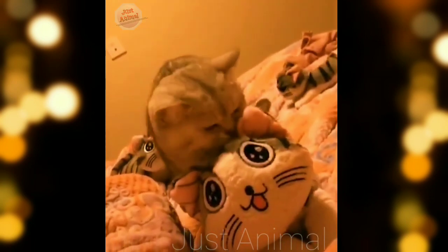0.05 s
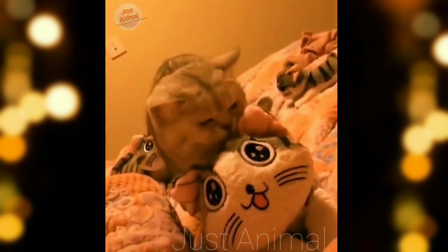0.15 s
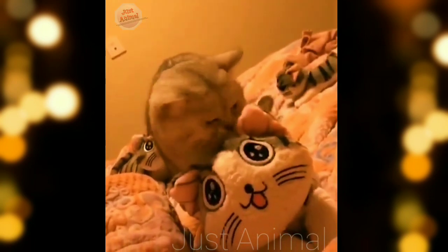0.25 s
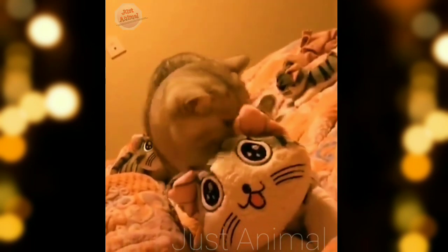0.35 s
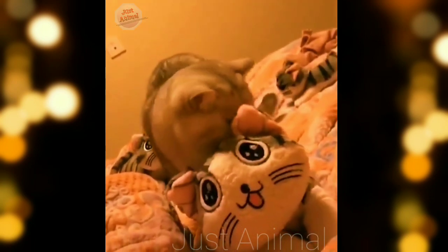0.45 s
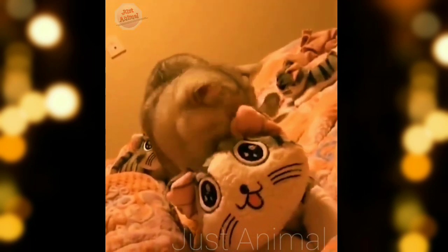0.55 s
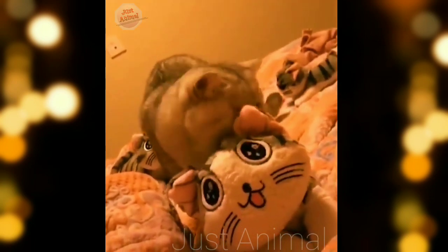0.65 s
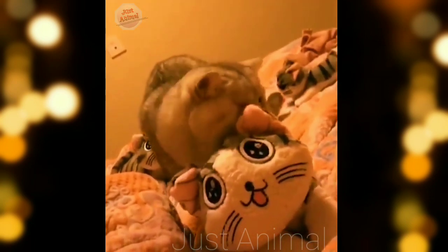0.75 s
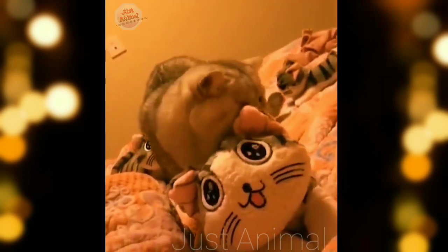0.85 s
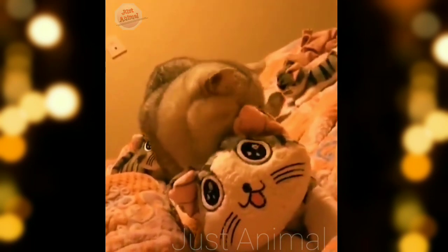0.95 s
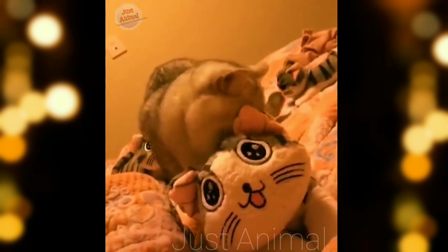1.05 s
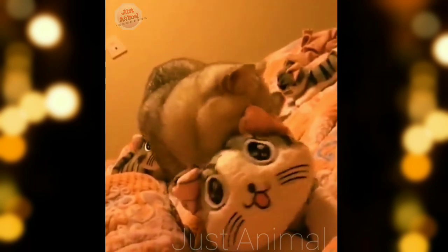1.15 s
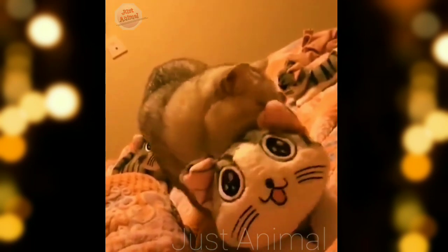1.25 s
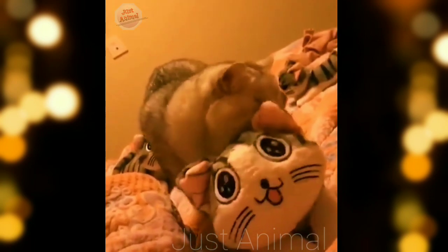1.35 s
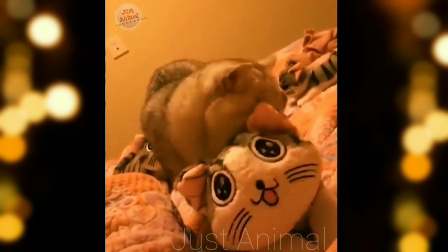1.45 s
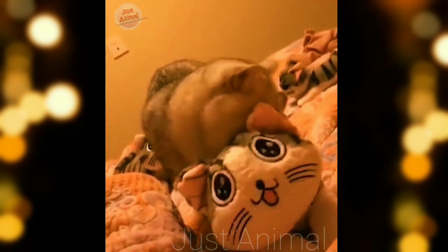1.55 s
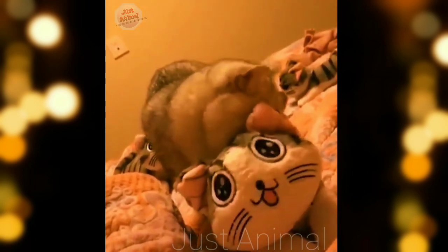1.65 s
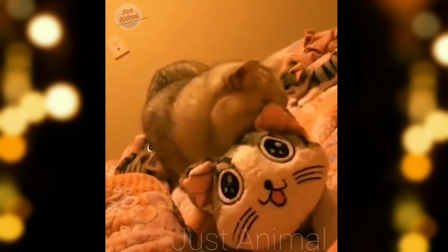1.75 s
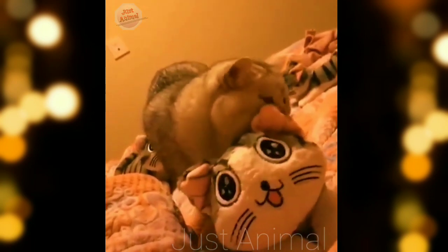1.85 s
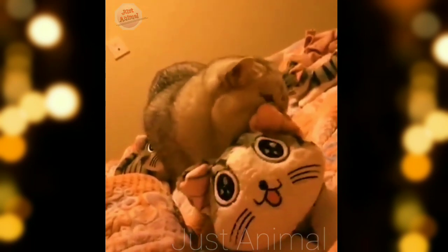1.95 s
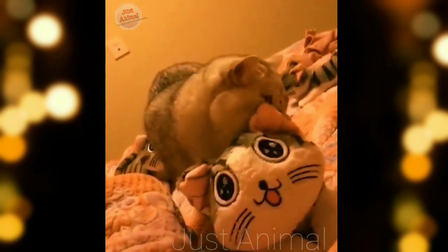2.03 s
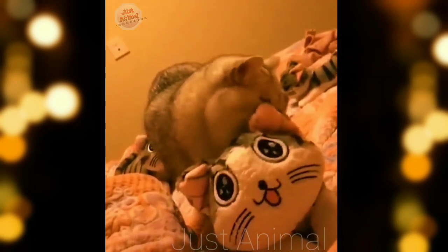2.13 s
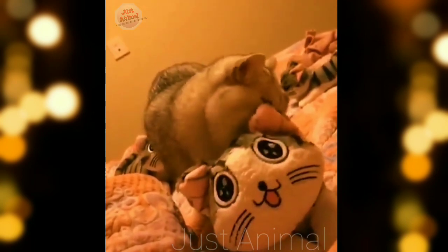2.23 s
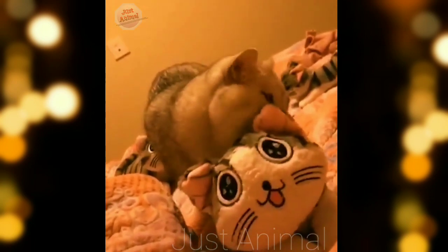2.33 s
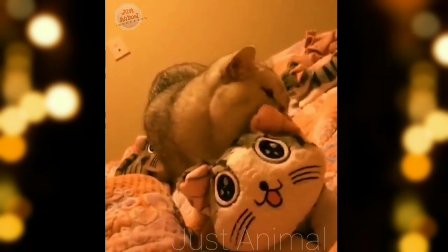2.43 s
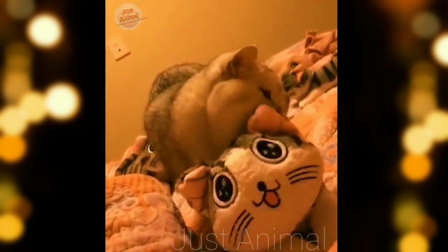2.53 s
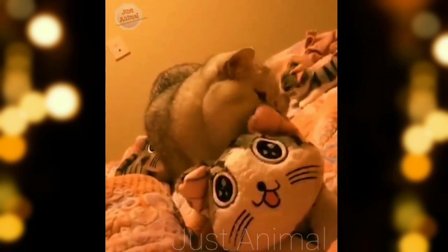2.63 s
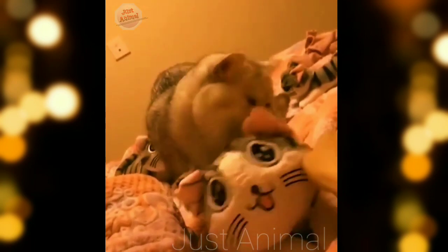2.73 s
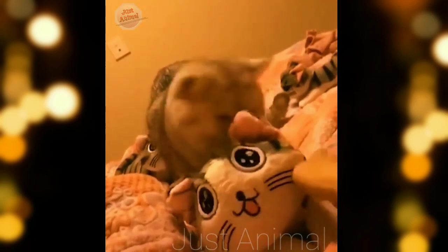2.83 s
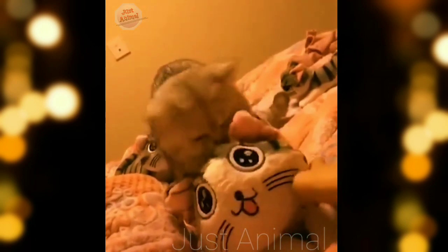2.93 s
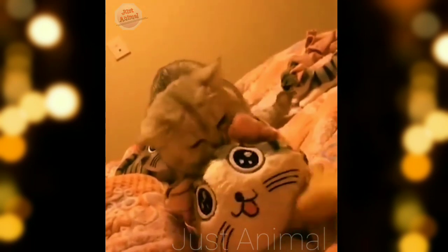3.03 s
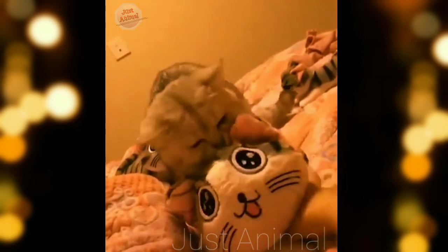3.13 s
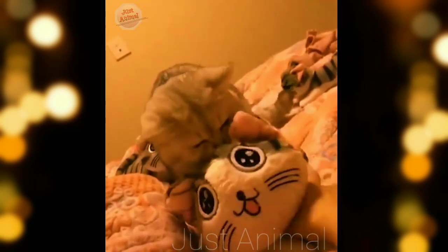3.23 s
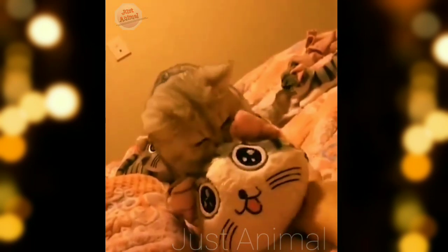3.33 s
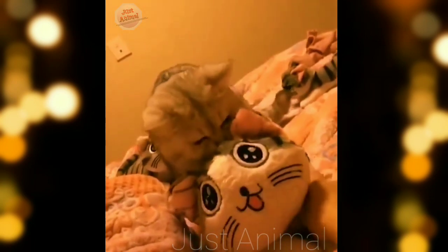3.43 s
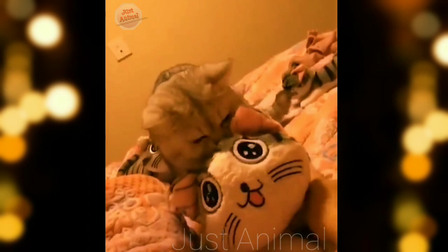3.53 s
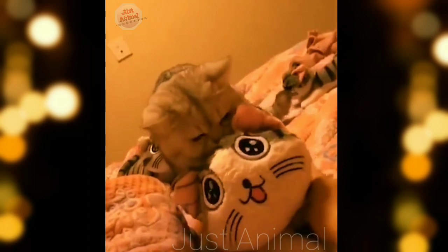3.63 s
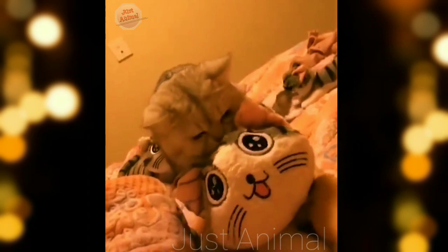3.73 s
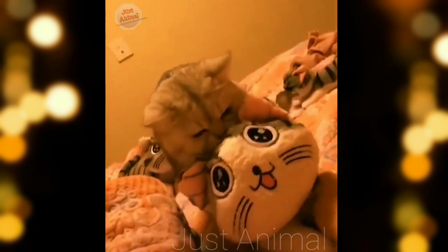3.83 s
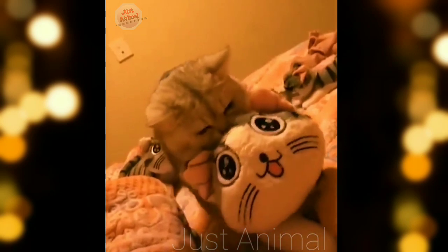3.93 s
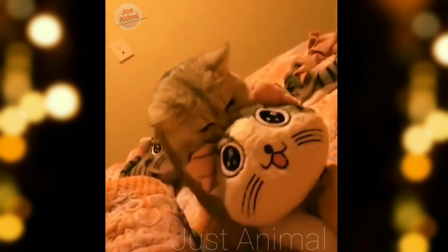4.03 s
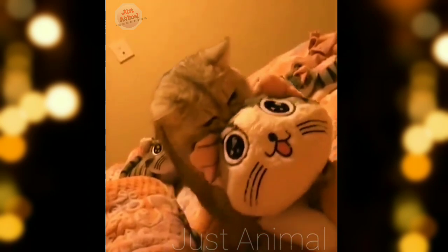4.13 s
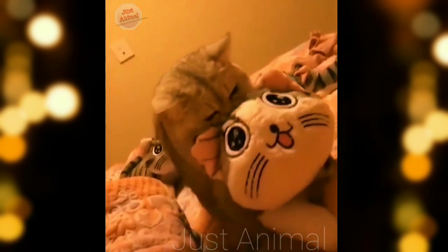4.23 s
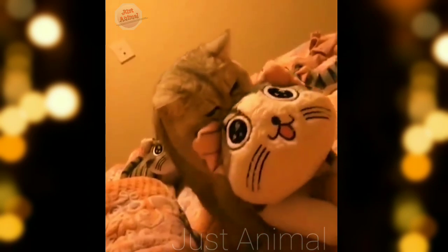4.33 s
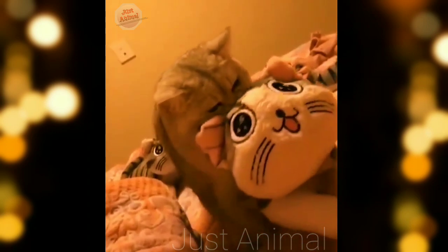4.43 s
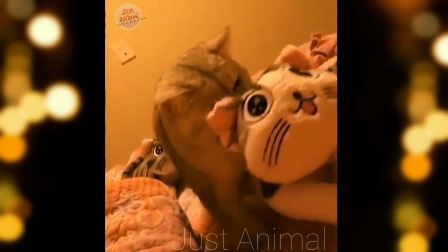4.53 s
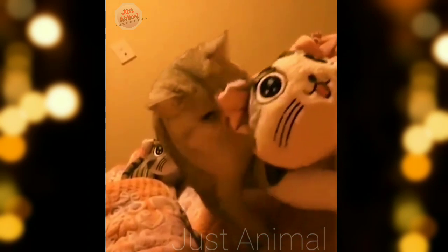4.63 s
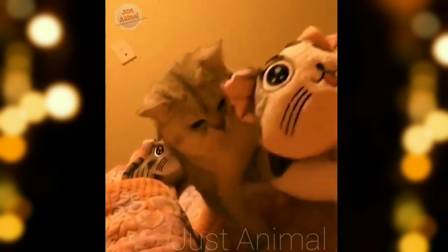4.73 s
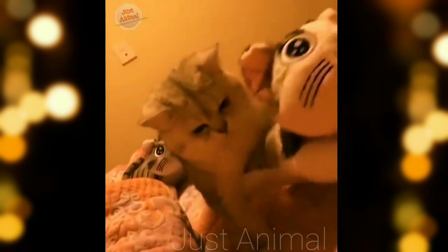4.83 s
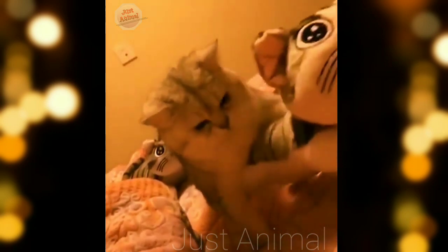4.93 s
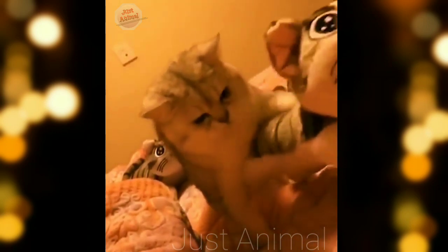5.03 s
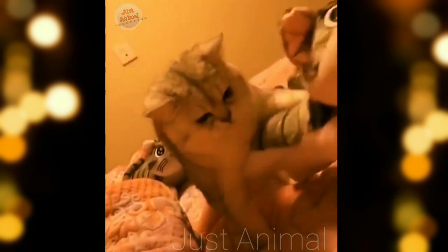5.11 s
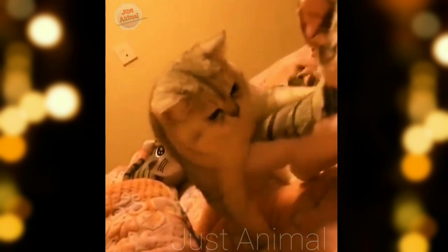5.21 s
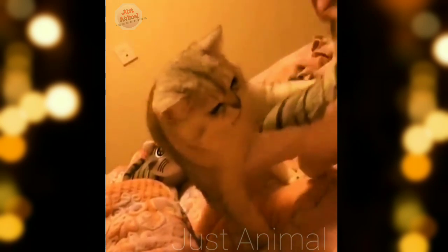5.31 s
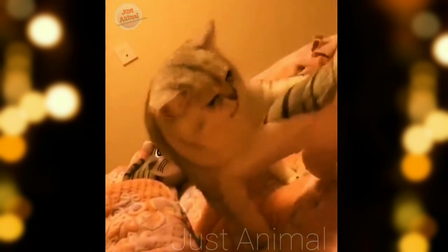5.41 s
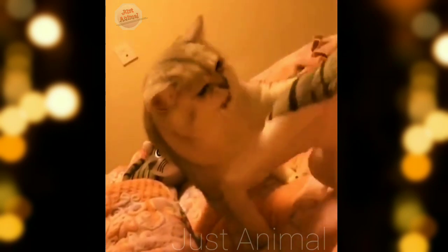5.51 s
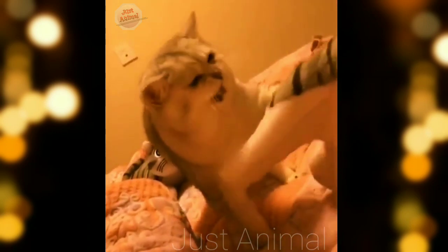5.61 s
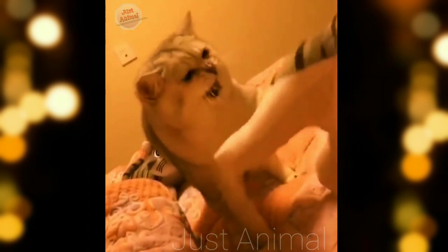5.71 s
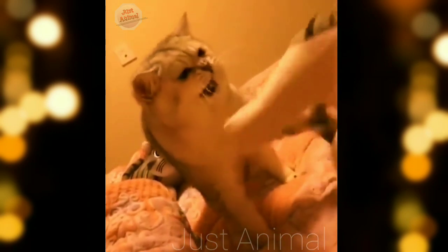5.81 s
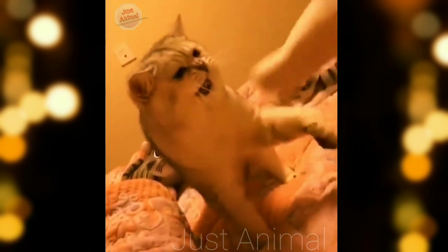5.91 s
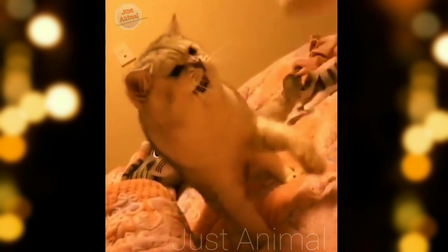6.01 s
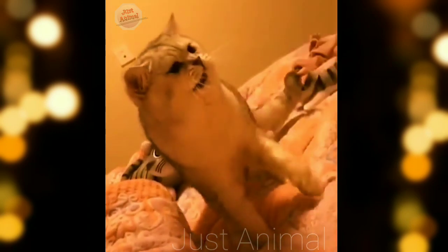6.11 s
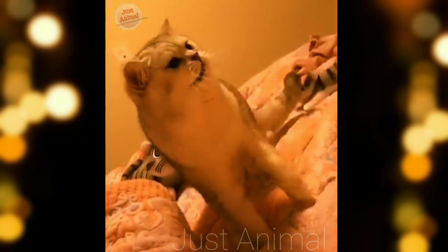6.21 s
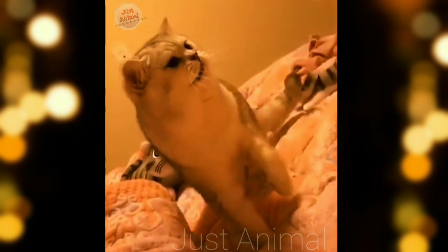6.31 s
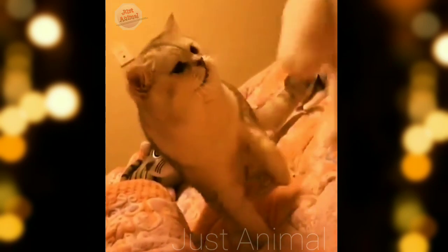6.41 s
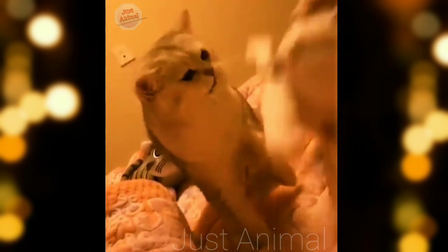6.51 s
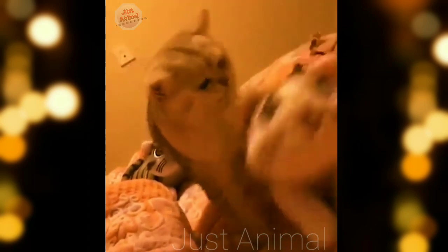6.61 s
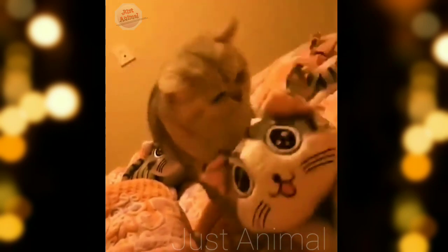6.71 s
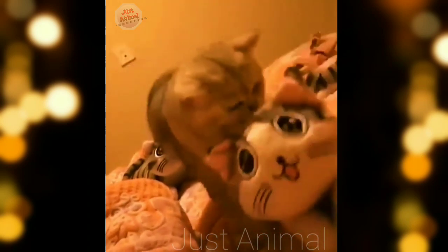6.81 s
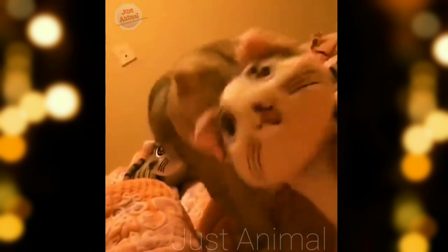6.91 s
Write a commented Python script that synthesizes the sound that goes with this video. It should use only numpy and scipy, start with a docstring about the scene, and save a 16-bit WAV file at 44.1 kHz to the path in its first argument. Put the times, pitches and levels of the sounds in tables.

```python
"""A cat on a bed, pestered with a plush toy, close to the microphone in a small, soft room, over hiss and rumble.
Soft low handling thumps and rustles of fabric come now and then, both as grainy noise; then a faint mew, a stack of
partials. Five quick peeps, nearly pure tones, run into a short trill; two more peeps follow, the second with a faint
echo, then one on the brink of the long angry meow. That starts through a half-closed mouth, bursts open loudly enough
to clip the microphone, sinks and rises again. Mew, trill and meow share rough vocal folds under a changing throat."""
import sys
import numpy as np
from scipy import signal
from scipy.fft import rfft, irfft, next_fast_len
from scipy.io import wavfile
from scipy.ndimage import uniform_filter1d, map_coordinates

SR = 44100
rng = np.random.default_rng(int(sys.argv[2]) if len(sys.argv) > 2 else 0)


def store_pcm(level_fs):
    """Save levels as 16-bit WAV."""
    pcm = np.round(np.clip(level_fs, -1, 1) * 32767).astype(np.int16)
    wavfile.write(sys.argv[1], SR, np.atleast_2d(pcm).T)


N = 307046

# Background hiss and rumble: f/Hz, relative density/dB
AIR_SPECTRUM = [(15, -30), (25, -9.5), (86, 1), (214, -7.5), (245, -7.5), (312, -4.5), (534, -17),
                (1370, -4), (1940, -2), (3500, -14), (4220, -14.5), (4700, -16.5), (5990, -22.5),
                (13000, -36), (15400, -38)]
# Background over time: t/s, level/dB
AIR_LEVEL = [(0, -41.5), (4.8, -41.5), (5.55, -46.5), (5.7, -53.5), (6.96, -49.5)]
# Soft low handling thumps: t/s, length/s, level/dB
HANDLING_THUMPS = [(.03, 0.29, -44.5), (2.15, 0.089, -55), (4.33, 0.227, -53)]
# Colour of the thumps: f/Hz, relative density/dB
THUMP_SPECTRUM = [(12, -36.5), (20, -58), (48, -2.5), (118, -17), (253, -17.5), (300, -25), (390, -51.5),
                  (660, -120)]
# Rubs of fabric: t/s, length/s, level/dB
FABRIC_RUBS = [(0.381, 0.064, -45), (0.986, 0.041, -43.5), (1.058, 0.0094, -37), (1.073, 0.02, -41.5),
               (1.529, 0.08, -46.5), (1.599, 0.052, -43), (2.039, 0.15, -43.5), (2.59, 0.1, -41.5),
               (2.675, 0.056, -39)]
# Colour of the rubs: f/Hz, relative density/dB
FABRIC_SPECTRUM = [(240, -54.5), (400, -29), (880, -0.5), (1130, -4.5), (1770, -11), (1910, -6),
                   (3900, -7.5), (14000, -50)]

# The faint mew: t/s, pitch f/Hz, level/dB, mouth opening (0-1)
MEW = [(.487, 616, -34.5, 0.32), (.53, 610, -27, 0.39), (.575, 628, -24, 0.48), (.6, 617, -26.5, 0.4),
       (.63, 642, -24.5, 0.41), (.655, 643.5, -29, 0.52), (.7, 619.4, -24, 0.48), (.76, 604.4, -28, 0.37),
       (.8, 588.5, -29.5, 0.51), (.835, 584, -37.5, 0.66), (.862, 555, -25.5, 0.13), (.905, 578, -37, 0.14)]
# Peeps with the mouth closed, one of them a faint echo: t/s, length/s, base pitch f/Hz, sag in mid-peep
# (share of pitch), base level/dB, second harmonic level/dB (against the fundamental), jitter (share of pitch)
CHIRPS = [(2.17, 0.035, 874, 0.074, -33.5, -12, 0.076), (2.211, 0.026, 910, 0.03, -35, -20, 0.067),
          (2.243, 0.031, 925, -0.0055, -34, -16, 0.045), (2.277, 0.029, 858, -0.07, -30, -26, 0.097),
          (2.306, 0.024, 892, 0.0047, -30.5, -24, 0.085), (3.0757, 0.026, 784, -0.012, -33, -24, .025),
          (3.194, 0.051, 828, 0.13, -26.5, -10, 0.016), (3.249, .029, 826, -0.033, -43, -14, .03),
          (4.887, 0.011, 880, 0.082, -27.5, -14, 0.12)]
# The short trill: t/s, pitch f/Hz, level/dB, mouth opening (0-1)
TRILL = [(2.337, 455, -25.5, 0), (2.372, 458, -27, 0), (2.395, 458, -23, 0), (2.445, 472, -23, 0),
         (2.466, 518, -26.5, 0), (2.485, 528, -24, 0), (2.512, 570, -32.5, 0.05), (2.53, 655, -32, .12),
         (2.541, 670, -41, .2), (2.553, 690, -45, .3)]
# The long meow: t/s, pitch f/Hz, level/dB, mouth opening (0-1)
MEOW = [(4.895, 641, -33, 0.38), (4.925, 584.4, -29.5, 0.5), (5.0, 712.7, -20, 0.42),
        (5.095, 693.6, -17, 0.47), (5.125, 732.6, -13.7, 0.53), (5.24, 738.5, -10.5, 0.55),
        (5.33, 724.5, -10.5, 0.57), (5.44, 728.4, -11.5, 0.56), (5.52, 713.5, -14, 0.49),
        (5.568, 754, -16, 0.62), (5.583, 736.4, -1.5, 1), (5.6, 745, -1.5, 1), (5.609, 794, -6.5, 0.9),
        (5.618, 800, -2, 1), (5.638, 838.5, -5.5, 1), (5.645, 850, -3, 0.93), (5.68, 837, -8, 0.96),
        (5.73, 846.5, -11.5, 0.93), (5.775, 917, -5.5, 0.95), (5.815, 959, -8, 0.99),
        (5.848, 1028, -13.5, 0.85), (5.89, 1064, -8.5, 0.91), (5.94, 1092, -3.5, 1.0),
        (6.03, 1111, -3.5, 1), (6.1, 1071, -11, 0.94), (6.22, 1029, -14, 0.85), (6.27, 962, -9, 0.97),
        (6.31, 934.4, -10, 0.84), (6.35, 911.6, -16, 0.62), (6.42, 765.5, -21.5, 0.63),
        (6.445, 697, -25.5, 0.58), (6.53, 659.4, -24.5, 0.61), (6.62, 659, -29, 0.57),
        (6.79, 684.3, -22.5, 0.58), (6.89, 723, -18.5, 0.52), (6.905, 755, -18.5, 0.56),
        (6.93, 836, -21.5, 0.56), (6.96, 844, -15.5, 0.69)]

# Throat with the mouth shut: f/Hz, relative gain/dB
SHUT_THROAT = [(450, -17.5), (630, -13), (850, 7), (1100, -7), (1330, -22.5), (2000, -31), (3000, -46.5),
               (6000, -35)]
# Throat with the mouth half open: f/Hz, relative gain/dB
HALF_OPEN_THROAT = [(620.0, -6), (900.0, 9.5), (1300.0, -4.5), (1850.0, -0.5), (2290.0, 5), (2460.0, -14),
                    (2850.0, -14.5), (3600.0, -17.5), (4400.0, -22), (5100.0, -23.5), (5850.0, -19.5),
                    (6500.0, -45.5), (7300.0, -71), (9000.0, -49.5)]
# Throat with the mouth wide open: f/Hz, relative gain/dB
WIDE_THROAT = [(700, -46), (1000, -21), (1700, -23), (2400, -3), (3000, 1.7), (3400, -2), (3950, -4),
               (4200, -13.5), (4500, -13.5), (4950, -28.5), (5400, -39.5), (6300, -42.5), (7400, -40),
               (8600, -53.5), (10000, -74.5), (14000, -71.5)]
# Throat in the snarl as the meow bursts open: f/Hz, relative gain/dB
SNARL_THROAT = [(750, -20.5), (1600, -19), (2200, -2.5), (2450, 3), (2950, -5.5), (3250, -12.5),
                (3700, -1.5), (4050, -3), (4500, -26), (5000, -30.5), (9000, -48)]
# Turbulence in the throat of a rough voice: f/Hz, relative density/dB
HUSK_SPECTRUM = [(400, -60), (650, -28), (800, 2), (950, 5), (1150, -12.5), (1700, -3.5), (2150, 8),
                 (2550, -9), (2900, -17.5), (3450, 8), (3900, -13), (4250, -4), (4650, -11), (5900, -12.5),
                 (7000, -44.5), (10000, -67)]

# Croak at the start of a call: middle t/s, half length/s, level/dB (against the voice)
CROAKS = [(0.485, 0.098, 0.5), (4.907, 0.06, -4)]
# Hoarse stretches: middle t/s, half length/s, added roughness (0-1)
HOARSE = [(0.53, 0.17, 0.33), (2.36, 0.04, 0), (2.529, 0.028, 0.6), (5.045, 0.053, 0.16),
          (5.283, 0.18, 0.15), (5.403, 0.03, .18), (5.785, 0.03, 0.09), (6.292, 0.021, 0.12),
          (6.404, .035, .35), (6.523, 0.09, 0.34), (6.962, 0.015, 0.2)]
# Stretches where a second oscillation beats: middle t/s, half length/s, offset f/Hz, depth (0-1)
THROBS = [(0.604, 0.11, 50, 0.35), (0.71, 0.097, -41.5, .6), (0.857, 0.078, -84, 0.7),
          (2.348, 0.02, 220, 0.33), (2.427, .035, 104.5, 0.65), (2.525, .022, -210, 0.8),
          (5.06, .05, 60.5, 0.4), (5.201, 0.093, 72.5, 0.13), (5.261, 0.011, 96, 0.9),
          (5.329, 0.022, 44.5, 0.78), (5.42, 0.035, -100, 0.44), (5.478, 0.028, 75, 0.73),
          (5.791, 0.041, 66.5, 0.2), (5.889, 0.036, 90.5, .15), (6.164, 0.1, 37.5, 0.16),
          (6.293, 0.034, 70.5, 0.42), (6.41, 0.026, -130, 0.45), (6.51, .05, 84.5, .55),
          (6.64, .09, 42.5, 0.57)]
# Jerks in the voice as the mouth flies open: middle t/s, half length/s, level change/dB
BREAKS = [(5.5741, 0.0014, -12), (5.5766, 0.0012, 4), (5.5801, .0018, -14)]

# A voice softer than FULL_DB loses DULLING dB of treble for each dB; half of the loss is reached at TREBLE_HZ
FULL_DB, DULLING, TREBLE_HZ = -22, 2.12, 2400
# Slackening folds lose treble: dB for each octave a second of falling pitch
SLACK_DB = 1
# The folds rattle below RATTLE_HZ: LOW_ROUGH adds to the HIGH_ROUGH that is always there (roughness 0-1)
RATTLE_HZ, RATTLE_STEEPNESS, LOW_ROUGH, HIGH_ROUGH = 647, 11, .58, 0.021
# More roughness: for each octave a second of glide, and at the start of a call, decaying over ONSET_S
GLIDE_ROUGH, ONSET_ROUGH, ONSET_S = 0.037, 0.57, 0.058
# Middle and half length of the snarl
SNARL_AT_S, SNARL_S = 5.604, 0.034
# Resonances of the wide throat climb with pitch: octaves for each octave above rest
REST_HZ, THROAT_RISE = 745, 0.2
# Each partial swells and fades on its own: depth at full mouth opening, random points a second
WANDER_DB, WANDER_PER_S = 2.5, 28
# Upper limit of the microphone
TOP_HZ = 15600


def amp(db):
    """Decibels to gain."""
    return 10 ** (np.asarray(db) / 20)


def unit(x):
    """x at rms 1."""
    return x / np.sqrt(np.mean(x ** 2) + 1e-20)


def along(points, hz):
    """(f/Hz, value) points read on a log axis."""
    f, v = np.transpose(points)
    return np.interp(np.log(hz + 1), np.log(f + 1), v)


def curves(rows, t):
    """Each column after the time, read at the times t."""
    s, *cols = np.transpose(rows)
    return [np.interp(t, s, c) for c in cols]


def wobble(t, rate):
    """A smooth random curve with rate knots a second."""
    knots = (t - t[0]) * rate
    return map_coordinates(rng.standard_normal(int(knots[-1]) + 4), [knots + 1])


def filtered(x, response):
    """x times a response of frequency."""
    size = next_fast_len(N + 8192)
    spectrum = rfft(x, size) * response(np.fft.rfftfreq(size, 1 / SR))
    return irfft(spectrum, size)[:N]


def noise(spectrum):
    """Coloured noise of rms 1."""
    white = rng.standard_normal(N)
    return unit(filtered(white, lambda hz: amp(along(spectrum, hz))))


def span(start, end):
    """Sample times from start to end, in seconds."""
    return np.arange(int(start * SR), min(int(end * SR), N)) / SR


def gate(t, edge):
    """Soft start and stop, each edge seconds long."""
    to_nearest_end = np.minimum(t - t[0], t[-1] - t)
    return np.sin(np.pi / 2 * np.clip(to_nearest_end / edge, 0, 1)) ** 2


def bell(t, at, width):
    """A brief swell from 0 to 1 and back."""
    return np.exp(-((t - at) / width) ** 2)


def add(track, t, sound):
    """Mix a sound in at its times."""
    track[round(t[0] * SR):][:len(t)] += sound


def air(rumble_db, hiss_db, patchy_db):
    """Background rumble and hiss waver separately, made uneven by random gains in time and frequency."""
    t = np.arange(N) / SR
    cells = signal.stft(noise(AIR_SPECTRUM), nperseg=1024)[2]
    # random gains smoothed over neighbouring frequencies, then times
    field = uniform_filter1d(rng.standard_normal(cells.shape), size=9, axis=0)
    field = uniform_filter1d(field, size=7, axis=1)
    uneven_cells = cells * amp(patchy_db * unit(field))
    uneven = unit(signal.istft(uneven_cells, nperseg=1024)[1][:N])
    rumble = filtered(uneven, lambda hz: 1 / (1 + (hz / 450) ** 4))
    hiss = uneven - rumble
    wavering = rumble * amp(rumble_db * wobble(t, 21)) + hiss * amp(hiss_db * wobble(t, 14))
    # the background sinks as the meow bursts open
    return amp(curves(AIR_LEVEL, t)[0]) * wavering


def strokes(rows, spectrum, grain_db):
    """Rubs and thumps: short, grainy swells of coloured noise."""
    pressure = np.zeros(N)
    for s, length, db in rows:
        t = span(s, s + length)
        swell = amp(grain_db * wobble(t, 490)) * gate(t, length / 2)
        add(pressure, t, amp(db) * unit(swell))
    return pressure * noise(spectrum)


def room(x, t60):
    """Near walls answer briefly with a decaying noise tail; the bedding soaks up the rest."""
    t = span(0, .4)
    tail = rng.standard_normal(len(t)) * amp(-60 * t / t60) * (t > .004)
    return signal.fftconvolve(x, tail / np.linalg.norm(tail))[:N]


def roughness(t, pitch):
    """The voice is rough when low, when gliding, at its start and where it turns hoarse."""
    low = LOW_ROUGH / (1 + (pitch / RATTLE_HZ) ** RATTLE_STEEPNESS)
    glide = GLIDE_ROUGH * np.abs(np.gradient(np.log2(pitch), t))
    onset = ONSET_ROUGH * np.exp((t[0] - t) / ONSET_S)
    hoarse = sum(extra * bell(t, s, width) for s, width, extra in HOARSE)
    return np.clip(HIGH_ROUGH + low + glide + onset + hoarse, 0, 1)


def slackness(t, pitch):
    """Slackening folds: loss of treble in dB while the pitch falls."""
    fall = np.maximum(-np.gradient(np.log2(pitch), t), 0)
    return SLACK_DB * uniform_filter1d(fall, size=900)


def partials(t, pitch, level_db, opening, count):
    """Level in dB of each partial: the mouth shapes the throat, which shares out the voice's power."""
    hz = np.arange(1, count + 1)[:, None] * pitch
    shut = np.clip(1 - 2 * opening, 0, 1)
    wide = np.clip(2 * opening - 1, 0, 1)
    # reading the throat lower down moves its resonances up
    at_rest = hz * (REST_HZ / pitch) ** (THROAT_RISE * wide)
    db = shut * along(SHUT_THROAT, hz)
    db += (1 - shut - wide) * along(HALF_OPEN_THROAT, at_rest)
    db += wide * along(WIDE_THROAT, at_rest)
    snarl = np.exp(-np.abs((t - SNARL_AT_S) / SNARL_S) ** 6)
    db = (1 - snarl) * db + snarl * along(SNARL_THROAT, hz)
    dull_db = DULLING * np.maximum(FULL_DB - level_db, 0) + slackness(t, pitch)
    db -= dull_db / (1 + (TREBLE_HZ / hz) ** 10)
    db += WANDER_DB * opening * np.array([wobble(t, WANDER_PER_S) for _ in hz])
    total_db = 10 * np.log10(np.sum(amp(db) ** 2, axis=0))
    return level_db + db - total_db


def beating(t):
    """Where the folds fall out of step, a second oscillation beats against the voice."""
    beat = np.zeros(len(t), complex)
    for s, width, offset_hz, depth in THROBS:
        drift = 2 * np.pi * np.cumsum(offset_hz * (1 + .12 * wobble(t, 35))) / SR
        beat += depth * bell(t, s, width) * np.exp(1j * drift)
    return beat


def call(rows, shudder_hz, quaver, jitter, flutter_db, rasp, husk_db, order=3, count=13):
    """Vocal folds give count partials; roughness shakes rate and size; beats are deepest on partial order."""
    t = span(rows[0][0] - .005, rows[-1][0] + .005)
    pitch, level_db, opening = curves(rows, t)
    rough = roughness(t, pitch)
    levels = partials(t, pitch, level_db, opening, count)
    # a slow shudder of the larynx swings the pitch
    shudder = 2 * np.pi * np.cumsum(shudder_hz * (1 + .2 * wobble(t, 35))) / SR
    depth, beat = np.sqrt(rough), beating(t)
    shaken = pitch * (1 + quaver * depth * np.sin(shudder) + jitter * rough * wobble(t, 260))
    phase = 2 * np.pi * np.cumsum(shaken) / SR

    # air leaking past the folds hisses once a cycle, less through a wide throat or slackening folds
    puffs = unit((1 + .8 * np.cos(phase)) * (1 + .6 * np.sin(shudder)))
    leak = noise(HUSK_SPECTRUM)[:len(t)] * puffs
    eased_db = 14 * np.maximum(opening - .6, 0) + slackness(t, pitch) / 2
    voice = amp(np.maximum(levels[0], levels[1]) + husk_db - eased_db) * depth * leak

    # alternate strong and weak pulses add a line between the first two partials
    croak = sum(amp(db) * bell(t, s, width) for s, width, db in CROAKS)
    croak_line = np.cos(3 * phase / 2 + 1.1 * wobble(t, 280))
    voice += amp(level_db) * croak * unit(amp(4 * wobble(t, 130))) * croak_line

    for k, level in enumerate(levels, 1):
        # the fundamental is steadiest; overtones dip in quick notches and fray into noise
        notches = flutter_db * depth * wobble(t, 160) ** 2 * np.interp(k, [1, 3, 4], [.6, .8, 1])
        side = beat * np.interp(k / order, [.3, .7, 1, 2], [.3, .55, 1, .85])
        flutter = unit(amp(-notches)) * (1 + side) / np.sqrt(1 + np.abs(side) ** 2)
        fray = np.minimum(rasp * rough * np.interp(k, [1, 3, 5], [.25, .75, 2.4]), .9)
        ragged = (wobble(t, 420) + 1j * wobble(t, 420)) / np.sqrt(2)
        grain = np.sqrt(1 - fray ** 2) + fray * ragged
        # the throat delays the partials unevenly, spreading each pulse over its cycle
        carrier = np.exp(1j * (k * phase - np.pi * k * k / 4))
        voice += amp(level) * np.real(flutter * grain * carrier)

    breaking_db = sum(db * bell(t, s, width) for s, width, db in BREAKS)
    return t, np.sqrt(2) * voice * amp(breaking_db) * gate(t, 0.0015)


def cat():
    """The three calls voiced by the folds: mew, trill and long meow."""
    track = np.zeros(N)
    add(track, *call(MEW, shudder_hz=48, quaver=.024, jitter=.024, flutter_db=7, rasp=.4,
                     husk_db=-17, count=10))
    add(track, *call(TRILL, shudder_hz=62, quaver=.035, jitter=.055, flutter_db=3, rasp=.7,
                     husk_db=-25, order=2, count=5))
    add(track, *call(MEOW, shudder_hz=62, quaver=.021, jitter=.03, flutter_db=6, rasp=.66,
                     husk_db=-13.5))
    return track


def chirps(third_db, accent_db, fade_db, pop, tremble_db):
    """Closed-mouth peeps: almost pure tones that pop in high, bend in the middle and fade."""
    track = np.zeros(N)
    for s, length, hz, sag, db, overtone_db, jitter in CHIRPS:
        t = span(s, s + length)
        age = np.linspace(0, 1, len(t))
        start = np.exp((t[0] - t) / 0.006)
        # a negative sag bends the pitch upwards
        bend = -sag * np.sin(np.pi * age ** 0.72)
        pitch = hz * (1 + pop * start + bend + jitter * wobble(t, 327))
        phase = 2 * np.pi * np.cumsum(pitch) / SR
        # the third harmonic is set against the second
        overtones = np.cos(2 * phase) + amp(third_db) * np.sin(3 * phase)
        tone = np.sin(phase) + amp(overtone_db) * overtones
        level = db + accent_db * start + fade_db * age ** 6 + tremble_db * wobble(t, 232)
        add(track, t, amp(level) * unit(tone) * gate(t, 0.003))
    return track


def scene():
    """Cat, fabric and thumps close by, their answer from the walls, and the background."""
    background = air(rumble_db=1.5, hiss_db=1.0, patchy_db=2)
    thumps = strokes(HANDLING_THUMPS, THUMP_SPECTRUM, grain_db=-1.0)
    rubs = strokes(FABRIC_RUBS, FABRIC_SPECTRUM, grain_db=4.5)
    voice = cat() + chirps(third_db=-9, accent_db=4.0, fade_db=-7.5, pop=0.13, tremble_db=1.8)
    near = voice + rubs + thumps
    walls = amp(-14) * room(near, t60=.2)
    return (near + walls + background)[None]


def record(dry):
    """The microphone clips at full scale and keeps nothing above its band limit."""
    clipped = np.clip(dry[0], -1, 1)
    return filtered(clipped, lambda hz: np.where(hz < TOP_HZ, 1, 0))[None]


dry = scene()
out = record(dry)
store_pcm(out)
```